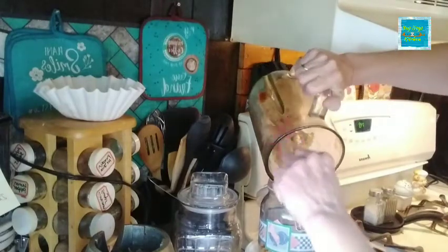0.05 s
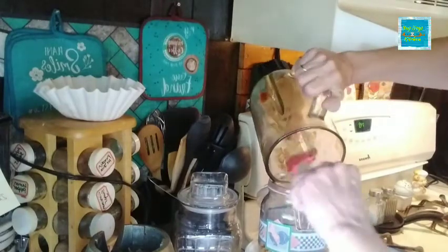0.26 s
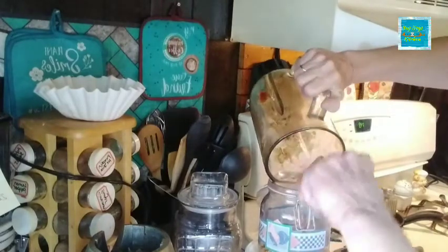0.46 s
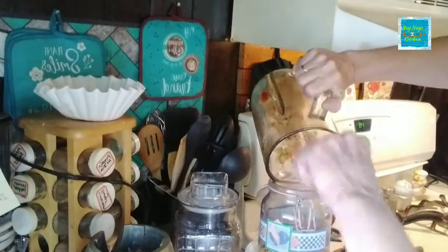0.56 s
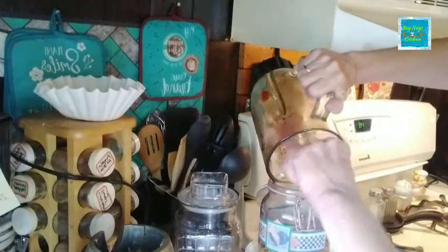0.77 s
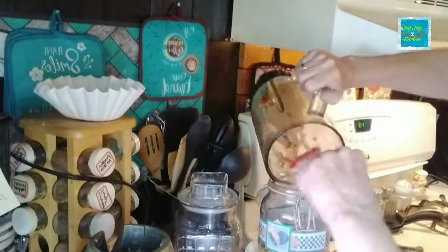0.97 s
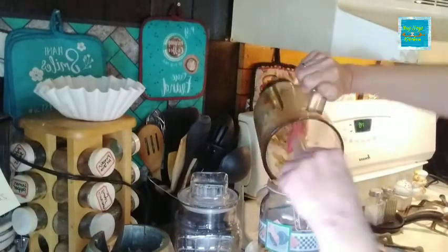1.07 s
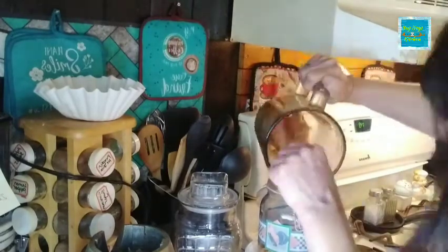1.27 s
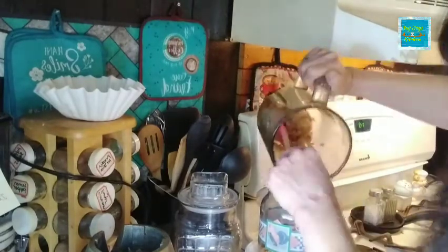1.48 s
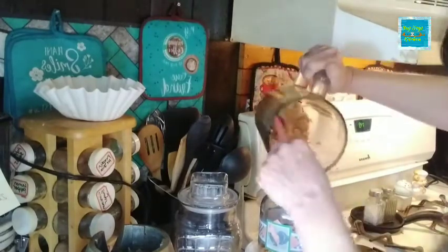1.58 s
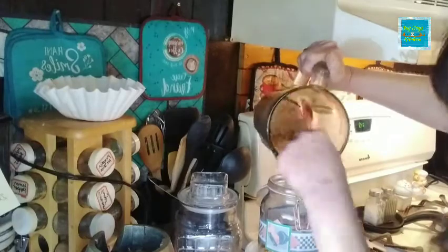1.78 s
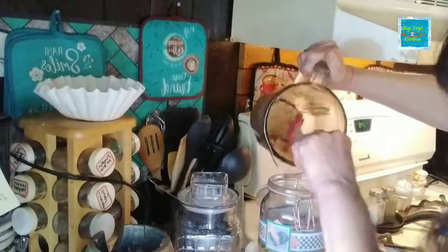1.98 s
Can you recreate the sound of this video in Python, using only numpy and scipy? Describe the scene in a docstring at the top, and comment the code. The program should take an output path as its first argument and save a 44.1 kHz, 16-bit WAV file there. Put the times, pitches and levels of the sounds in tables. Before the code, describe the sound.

Glass jar scraped with a spatula: light taps, a wet smack, a short drag, hard clunks

```python
"""A spatula scrapes out a thick glass blender jar held tipped over a storage jar in a small kitchen.
An appliance hums and whines throughout. After a faint touch and smear come light knocks and a wet smack;
then one stroke drags along the wall, with the hardest knocks near its end; faint smacks and smears follow.
Knocks are decaying modes of glass, air and spatula over a noise crack; the drag is a train of such touches.
Brief sines give the singing edge, noise bursts and sparse clicks the food, wavering sines the appliance."""
import sys
import numpy as np
from scipy import signal
from scipy.fft import rfft, irfft, next_fast_len
from scipy.io import wavfile
from scipy.ndimage import uniform_filter1d

SR = 44100
rng = np.random.default_rng(int(sys.argv[2]) if len(sys.argv) > 2 else 0)


def bounce(signal):
    """Save signal as a 16-bit WAV file at the path given by the first command-line argument."""
    frames = np.transpose(np.atleast_2d(signal))
    limited = np.clip(frames, -1, 1)
    pcm = np.round(limited * 32767).astype(np.int16)
    wavfile.write(sys.argv[1], SR, pcm)


N = 89478  # samples


def undb(db):
    """Logarithmic level: decibels to amplitude gain."""
    return 10 ** (np.asarray(db) / 20)


def unit(x):
    """Normalisation: scale to rms 1."""
    return x / np.sqrt(np.mean(x ** 2))


def fade(t60):
    """Exponential decay: 60 dB in t60 seconds, over half a second."""
    return np.exp(-np.log(1000) * np.arange(SR // 2) / SR / max(t60, 1e-3))


def colour(x, points):
    """Linear filtering: shape a spectrum by (f/Hz, level/dB) points, joined on a log frequency axis."""
    hz, db = np.array(points).T
    n = next_fast_len(2 * x.shape[-1])  # padding keeps the end from wrapping round
    f = np.maximum(np.fft.rfftfreq(n, 1 / SR), 1)
    gain = undb(np.interp(np.log(f), np.log(hz), db))
    return irfft(rfft(x, n) * gain, n)[..., :x.shape[-1]]


def walk(rate):
    """Low-pass random modulation: a wander of rms 1, from about `rate` random values per second."""
    k = int(SR / rate)
    steps = np.repeat(rng.standard_normal(N // k + 1), k)
    smooth = uniform_filter1d(uniform_filter1d(steps, k), k)
    return unit(smooth[:N])


def add(out, s, x):
    """Superposition: mix x in from time s."""
    i = max(int(s * SR), 0)
    out[..., i:i + x.shape[-1]] += x[..., :N - i]


def burst(points, t60):
    """Transient noise: a decaying coloured burst of energy 1."""
    x = colour(rng.standard_normal(SR // 2), points) * fade(t60)
    return x / np.linalg.norm(x)


def catches(rate, scatter_db):
    """Random impulse train: tiny slips of uneven size and either sign, `rate` per second on average."""
    happens = rng.random(N) < rate / SR
    size = undb(scatter_db * np.clip(rng.standard_normal(N), -2, 2))
    return happens * size * rng.choice([-1, 1], N)


PORT_PHASE_RAD = 0.79  # largest phase shift of a mode at each port, reached from 1 kHz up


def ring(modes, length, base_hz=1, tilt_db=0):
    """Modal superposition: damped sines of a struck body, tilted in dB per octave about its first mode."""
    t = np.arange(SR // 2) / SR
    out = 0
    for f, db, t60 in modes:
        hz = f * base_hz
        phase = PORT_PHASE_RAD * min(hz / 1000, 1) * rng.choice([-1, 1])
        apart = phase * np.array([[1], [-1]])  # opposite shifts at the two ports
        level = undb(db + tilt_db * np.log2(f / modes[0][0]))
        out = out + level * fade(t60 * length) * np.sin(2 * np.pi * hz * t + apart)
    return out * (1 - fade(0.0078))  # soft onset


# Modes of the glass: f/Hz, relative level/dB, t60/s at ring length 1
GLASS_MODES = [(1170, -9, .12), (1210, -7, .1), (1268, -3, .08), (1330, -2, .1), (1410, -11, .07),
               (1455, -9, .08), (1815, -21, .08), (2725, -17, .07), (3148, -17, .07), (3847, -15, .1),
               (4985, -24, .08), (6560, -28, .06), (6690, -31, .05), (6810, -29, .055), (7150, -35, .05),
               (10720, -38, .035)]
# Hollow low modes of the air in the jar: multiple of the lowest f, relative level/dB, t60/s at ring length 1
HOLLOW_MODES = [(1, 0, .14), (1.08, -13, .11), (1.33, -14, .09), (1.65, -16, .09)]
# Short clack of the spatula: multiple of its pitch, relative level/dB, t60/s at ring length 1
SPATULA_MODES = [(.94, 0, .04), (1, 0, 0.055), (1.045, -2.5, .05), (1.13, -8, 0.028)]
# Spectrum of the contact crack: f/Hz, relative level/dB per Hz
CRACK_SPECTRUM = [(120, -28), (300, -20), (520, 5.5), (680, -1), (900, 2), (1400, -9.5), (1700, 0),
                  (2400, -1.5), (3100, -7.5), (3500, -13), (3950, -3), (4300, -6.5), (4900, -6.5),
                  (5900, -17.5), (6900, -14.5), (8500, -26.5), (11500, -22.5), (15500, -40)]
CRACK_T60_S, CRACK_RISE_S, CRACK_DB = .05, .014, 19  # decay, onset time constant as a t60, added gain


def contact(glass_db, hollow_db, spatula_db, crack_db, tilt_db, hollow_hz, spatula_hz, length=1):
    """Impact excitation: one touch rings glass, hollow and spatula over a crack that echoes in the jar."""
    glass = undb(glass_db) * ring(GLASS_MODES, length, tilt_db=tilt_db)
    hollow = undb(hollow_db) * ring(HOLLOW_MODES, length, hollow_hz)
    spatula = undb(spatula_db) * ring(SPATULA_MODES, length, spatula_hz)  # pitched by where it touches
    noise = np.array([burst(CRACK_SPECTRUM, CRACK_T60_S) for _ in range(2)])
    crack = undb(crack_db + CRACK_DB) * noise * (1 - fade(CRACK_RISE_S))
    return glass + hollow + spatula + crack


# Blows of the spatula: t/s, relative levels of glass/dB, hollow/dB, spatula/dB and contact crack/dB,
# brightness of the glass/(dB per octave), hollow f/Hz, spatula f/Hz,
# ring length/1 (a multiple: shorter when the blade presses)
BLOW_EVENTS = [(0.001, -35.5, -37.5, -46.5, -37.5, -0.5, 384, 2050, 1.3),
               (0.6644, -36, -38, -34, -30, -4, 409, 2966, .8),
               (0.6963, -38.5, -35, -41, -48, 2, 420, 3080, .8),
               (0.7257, -41, -27.5, -36, -31, -8, 413.6, 2130, .7),
               (0.7356, -30, -29, -38, -38, -0.5, 403.3, 2117, 1),
               (0.7502, -41, -27, -43, -49, 1, 378, 2070, .55),
               (1.11, -20, -35.5, -25.5, -28.5, -1.5, 404, 2197, .8),
               (1.1187, -57.5, -41, -39, -29, 14.5, 389, 2230, 1),
               (1.1389, -32, -34.5, -43, -53, 3, 388, 2150, .9),
               (1.155, -40.5, -49, -44, -35, 7, 395, 2100, 1),
               (1.2734, -15.5, -16, -23.5, -19.5, 0, 407.8, 2285, .75),
               (1.2772, -14.5, -15, -18, -23.5, 0.5, 429.2, 3020, .65),
               (1.3029, -36, -24.5, -37, -38, -8, 429, 3060, .5),
               (1.3291, -37.5, -42, -21.5, -43, 6, 420, 2044, .7),
               (1.3347, -33.5, -49, -38, -31.5, 5.5, 436, 2030, .55)]


def knocks():
    """Impulse response: each knock or bounce on the jar sets off a free decay."""
    out = np.zeros((2, N))
    for s, *touch in BLOW_EVENTS:
        add(out, s, contact(*touch))
    return out


# Pressure of the dragging stroke: t/s, relative level/dB
STROKE_PRESSURE = [(1.105, -59), (1.118, -28.5), (1.145, -32.5), (1.18, -37.5), (1.22, -35.5), (1.27, -49),
                   (1.33, -65), (1.36, -44), (1.39, -66)]
CATCHES_PER_S, CATCH_SCATTER_DB = 770, 1  # mean rate, spread of size


def scrape(t):
    """Stick-slip friction: the edge catches and slips along the glass, each slip renewing its ring."""
    s, db = np.array(STROKE_PRESSURE).T
    pressure = undb(np.interp(t, s, db)) * (t > s[0]) * (t < s[-1])
    slips = catches(CATCHES_PER_S, CATCH_SCATTER_DB) * pressure
    touch = contact(glass_db=-9.5, hollow_db=-14, spatula_db=-15, crack_db=-17.5, tilt_db=-6,
                    hollow_hz=396, spatula_hz=2160)
    return signal.fftconvolve(slips[None], touch)[:, :N]


# Moments when the rubbing edge keeps one mode singing: t/s, length/s, f/Hz, relative level/dB, swell/(dB/s)
SINGING_MOMENTS = [(0.667, 0.0265, 1310, -33, -120), (0.697, 0.027, 1320, -36.5, -250),
                   (1.124, 0.098, 1210, -40.5, -70), (1.121, 0.057, 3836, -46, -50),
                   (1.1, 0.043, 398, -45, 77), (1.2745, 0.032, 3858, -29.5, -550),
                   (1.331, 0.015, 1338, -28, -200)]
SING_EDGE_S = 0.0027  # ramp at either end
SING_ROUGH, SING_FLUTTER_HZ = .22, 110  # depth of the roughness, random values per second


def singing(t):
    """Mode locking: stick and slip hold one mode for a moment, a short, slightly rough tone."""
    out = np.zeros(N)
    for s, length, hz, db, swell_db in SINGING_MOMENTS:
        age = np.clip(t - s, 0, length)
        edges = np.clip(np.minimum(age, length - age) / SING_EDGE_S, 0, 1)
        held = edges * undb(db + swell_db * age)
        rough = 1 + SING_ROUGH * (walk(SING_FLUTTER_HZ) + 1j * walk(SING_FLUTTER_HZ))
        out += held * np.real(rough * np.exp(2j * np.pi * hz * age))
    return out


# Wet smacks: t/s, relative level/dB
SMACK_EVENTS = [(0.7738, -9), (0.7795, -25), (1.648, -34)]
# Spectrum of a smack: f/Hz, relative level/dB per Hz
SMACK_SPECTRUM = [(1000, -25), (2800, -14), (5000, 6.5), (7500, 2), (9500, 2), (12000, -14), (16000, -14)]
SMACK_T60_S = 0.0097
# Smears of food under the blade, bell-shaped in time: t/s of the centre, half length/s, relative level/dB
SMEAR_EVENTS = [(0.106, 0.014, -59), (1.778, .025, -64.5), (1.843, 0.015, -61)]
# Spectrum of a smear: f/Hz, relative level/dB per Hz
SMEAR_SPECTRUM = [(2000, 7), (5000, -1), (8000, 0.5), (11000, -1.5), (15000, -26)]


def food(t):
    """Adhesive release: wet food smacks as it lets go, and crackles faintly as it is wiped."""
    wiping = sum(undb(db) * np.exp(-.5 * ((t - s) / half) ** 2) for s, half, db in SMEAR_EVENTS)
    out = wiping * unit(colour(catches(rate=4500, scatter_db=4), SMEAR_SPECTRUM))
    for s, db in SMACK_EVENTS:
        add(out, s, undb(db) * burst(SMACK_SPECTRUM, SMACK_T60_S))
    return out


def reflections(t60):
    """Diffuse reverberation: dense echoes of energy 1 with an evened-out spectrum; t60 is nominal."""
    decay = fade(t60)
    spectrum = rfft(rng.standard_normal(len(decay)) * decay * (1 - fade(0.045)))
    evened = irfft(spectrum / np.abs(spectrum) ** 0.34, len(decay))
    x = evened * decay ** 0.29 * (1 - fade(0.0027))
    return x / np.linalg.norm(x)


def echoes(x, t60):
    """Decorrelation: different reflections for the left and the right."""
    return np.array([signal.fftconvolve(side, reflections(t60))[:N] for side in x])


# Appliance tones: f/Hz, relative rms level/dB, left minus right/dB, unsteadiness/1
APPLIANCE_TONES = [(156.7, -43.5, 0, 0.3), (1161.8, -53.5, 8.5, 0.025), (1227, -67.5, -16, 0.58)]


def appliance(t):
    """Modulated tones: a wavering hum, a thin steady whine and a fainter unsteady one beside it."""
    out = np.zeros((2, N))
    for hz, db, pan_db, unsteady in APPLIANCE_TONES:
        wander = 1 + unsteady * (walk(22.5) + 1j * walk(16.1))  # amplitude and phase both waver
        tone = np.real(wander * np.exp(2j * np.pi * hz * t))
        out += unit(tone) * undb(db + np.array([[pan_db], [-pan_db]]) / 2)
    return out


# Spectrum of the room noise: f/Hz, relative level/dB per Hz
AIR_SPECTRUM = [(20, 3), (45, -3), (105, -7.5), (165, -2.5), (205, -3), (260, -17.5), (340, -12),
                (450, -12), (620, -20), (1300, -24.5), (2500, -29), (5000, -39), (8000, -47.5),
                (11000, -59), (15500, -58)]
AIR_DB, AIR_SHARED_HZ = -41, 620  # level; the two sides grow alike below this frequency


def room_noise():
    """Spatial coherence: coloured noise with a weak side part in the bass, so both sides share it."""
    mid, side = colour(rng.standard_normal((2, N)), AIR_SPECTRUM)
    highpass = signal.butter(1, AIR_SHARED_HZ, "high", fs=SR, output="sos")
    side = signal.sosfilt(highpass, side) * 0.69 + 0.32 * side
    return undb(AIR_DB) * unit(np.array([mid + side, mid - side]))


DIRECT = 0.18  # gain of the food's direct sound
NEAR_DB, RING_ECHO_DB, NEAR_T60_S = -2.5, -13, 0.054  # quick echoes of food and of jar, nominal decay
ROOM_DB, ROOM_T60_S = -9.5, 0.31  # room tail, nominal decay


def scene():
    """Direct sound and reverberation: work on the jar, counter echoes, a short tail, a humming kitchen."""
    t = np.arange(N) / SR
    jar = knocks() + scrape(t) + singing(t)
    wet = np.array([food(t)] * 2)
    near_jar = jar + undb(RING_ECHO_DB) * echoes(jar, NEAR_T60_S)
    near_wet = DIRECT * wet + undb(NEAR_DB) * echoes(wet, NEAR_T60_S)
    near = near_jar + near_wet
    tail = undb(ROOM_DB) * echoes(near, ROOM_T60_S)
    return near + tail + appliance(t) + room_noise()


# Colour of the left microphone port: f/Hz, level/dB
LEFT_PORT_COLOUR = [(200, -1), (500, 3), (2500, 2.5), (5500, 3), (6800, 8.5), (7800, 12), (8800, 3),
                    (10200, -3), (13000, -4.5), (16000, -3)]
# Colour of the right microphone port: f/Hz, level/dB
RIGHT_PORT_COLOUR = [(200, 1.5), (500, 1), (2500, 0), (5500, -1), (7500, -2.5), (9000, 3.5), (10300, 11.5),
                     (11500, 4.5), (13000, 0), (16000, -9)]
TOP_HZ = 15800


def record(dry):
    """Cavity resonance: each microphone port has its own treble peak; a steep low-pass cuts off the top."""
    heard = np.array([colour(dry[0], LEFT_PORT_COLOUR), colour(dry[1], RIGHT_PORT_COLOUR)])
    lowpass = signal.ellip(10, .1, 80, TOP_HZ, fs=SR, output="sos")
    return signal.sosfilt(lowpass, heard)


dry = scene()
out = record(dry)
bounce(out)
```